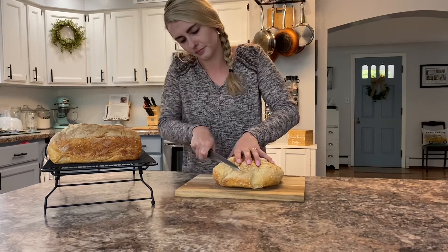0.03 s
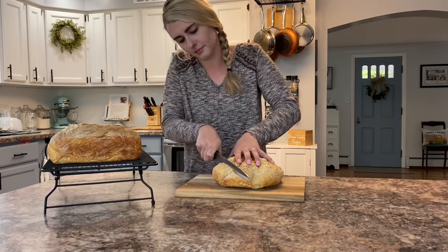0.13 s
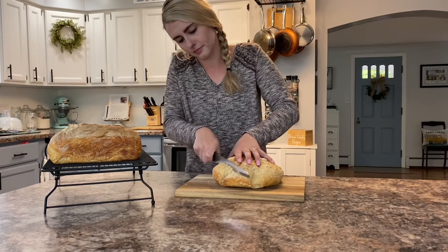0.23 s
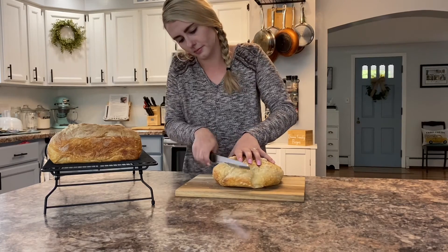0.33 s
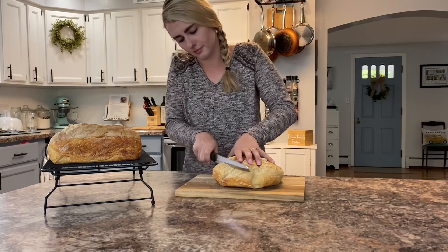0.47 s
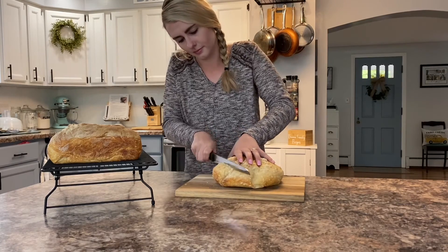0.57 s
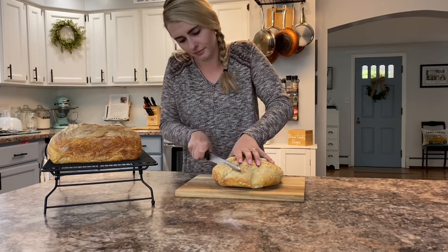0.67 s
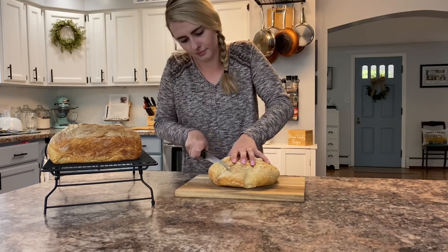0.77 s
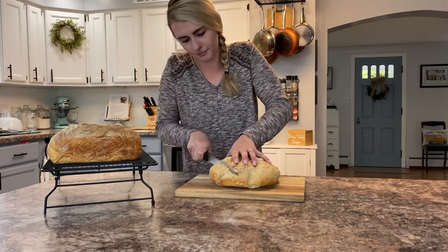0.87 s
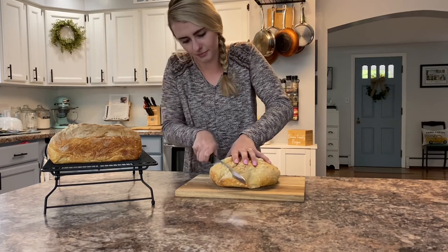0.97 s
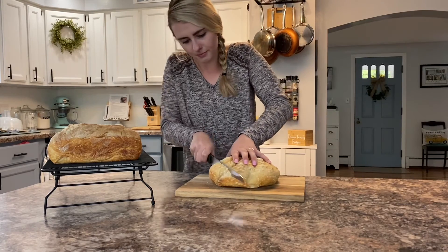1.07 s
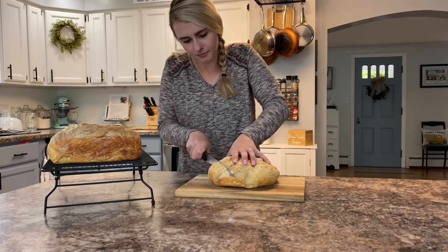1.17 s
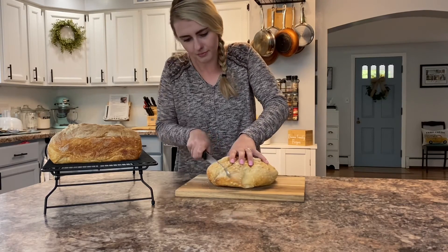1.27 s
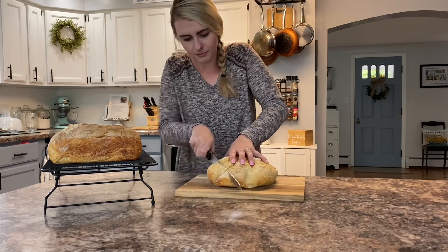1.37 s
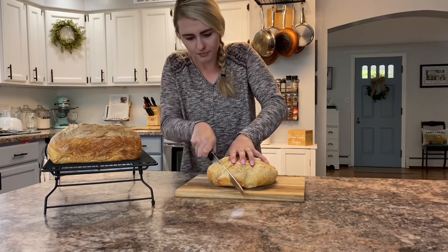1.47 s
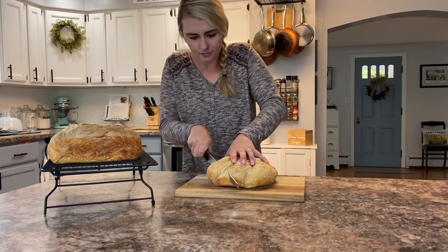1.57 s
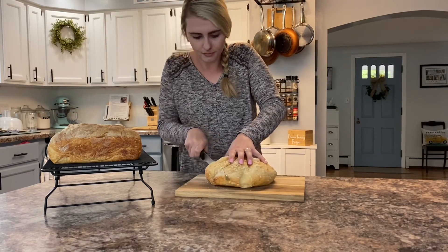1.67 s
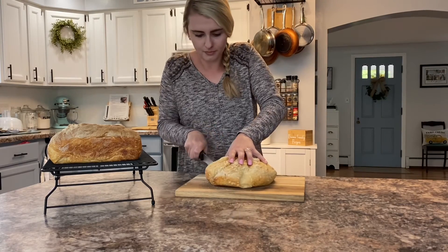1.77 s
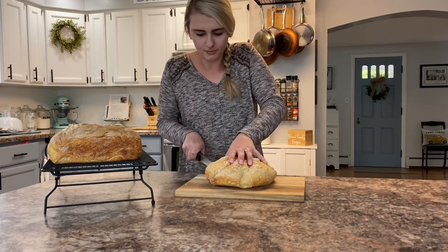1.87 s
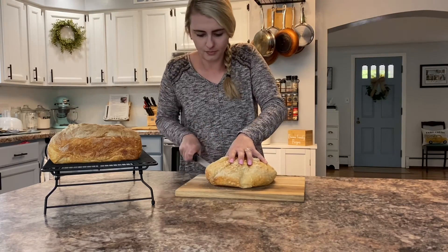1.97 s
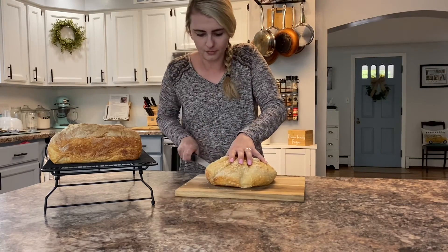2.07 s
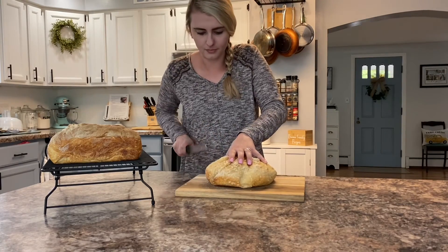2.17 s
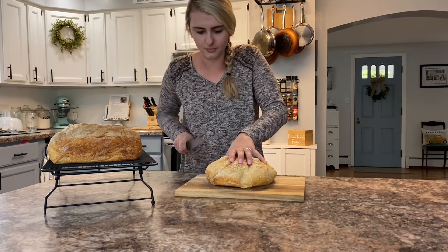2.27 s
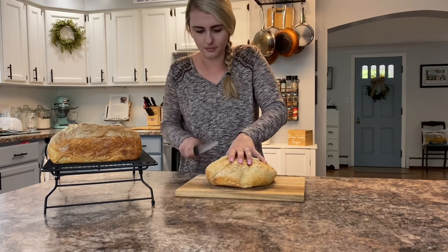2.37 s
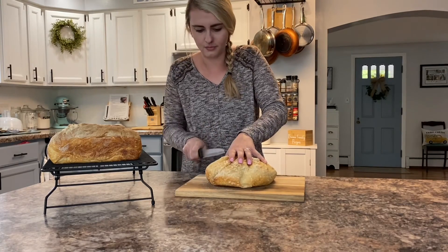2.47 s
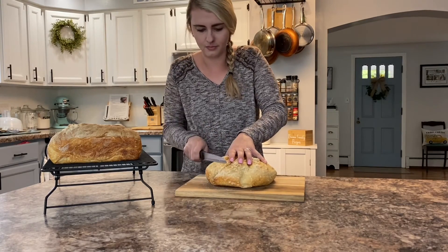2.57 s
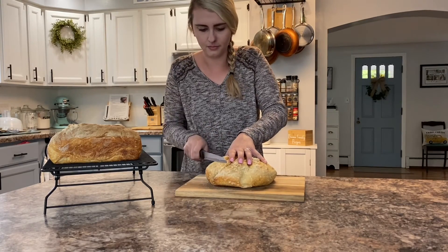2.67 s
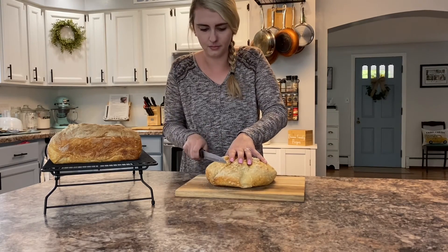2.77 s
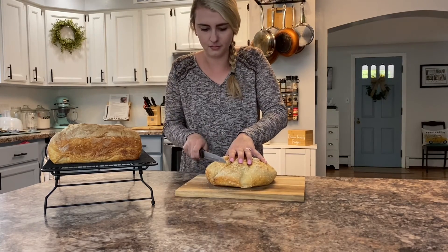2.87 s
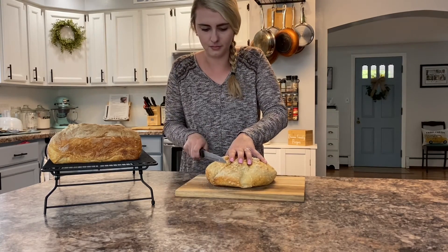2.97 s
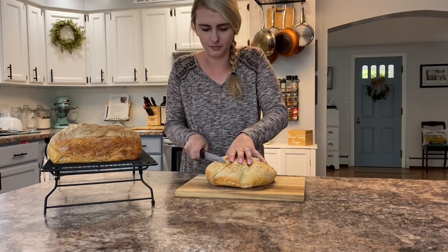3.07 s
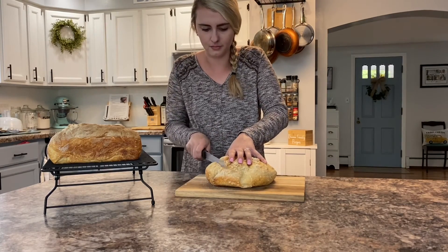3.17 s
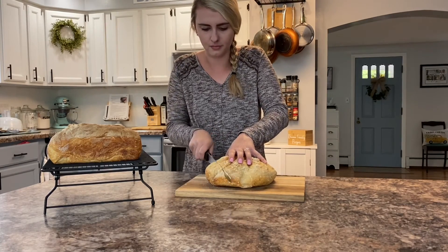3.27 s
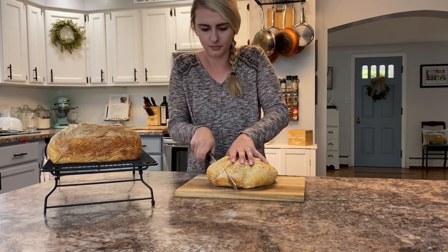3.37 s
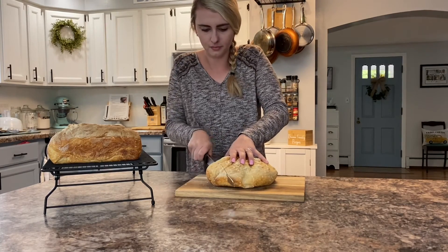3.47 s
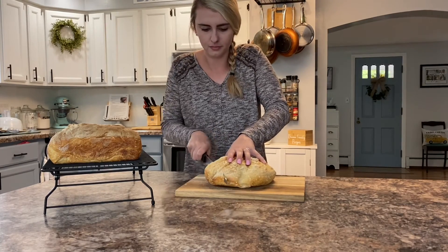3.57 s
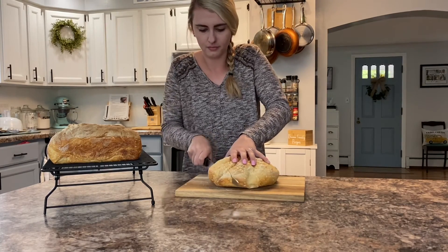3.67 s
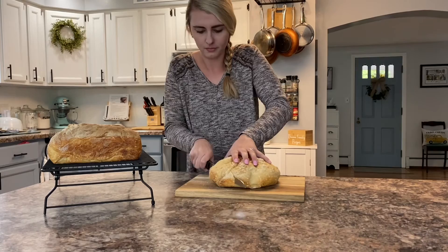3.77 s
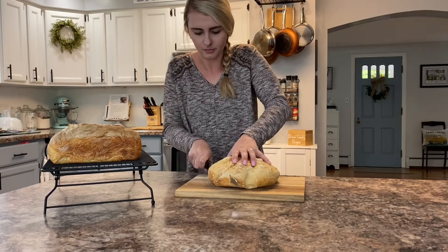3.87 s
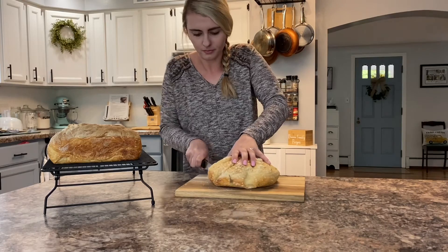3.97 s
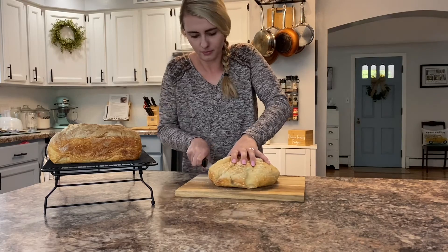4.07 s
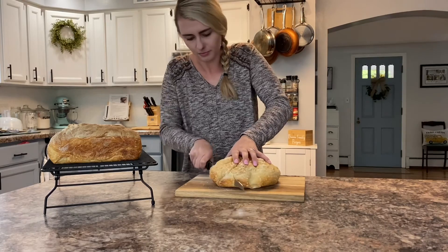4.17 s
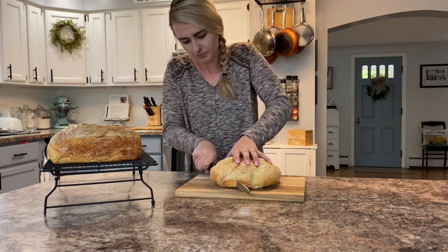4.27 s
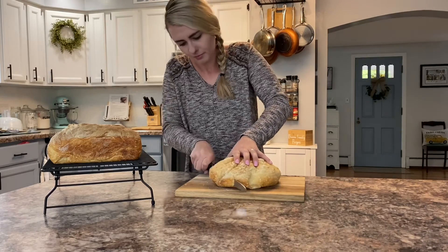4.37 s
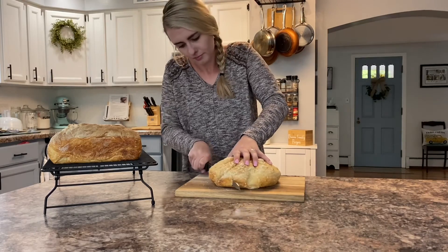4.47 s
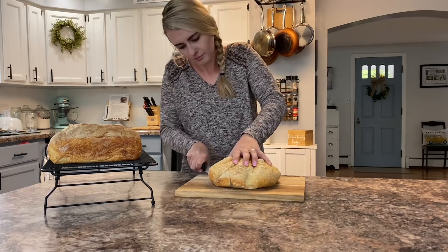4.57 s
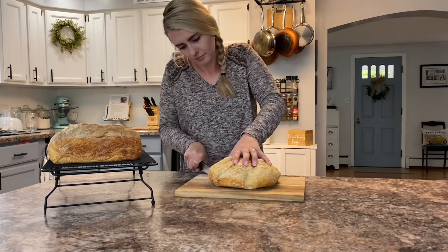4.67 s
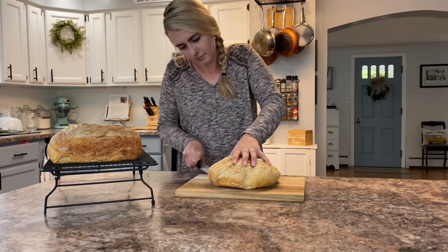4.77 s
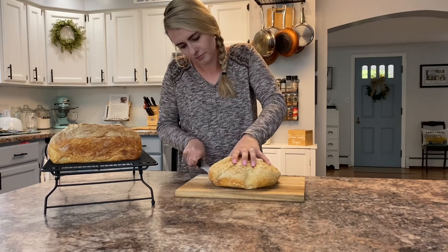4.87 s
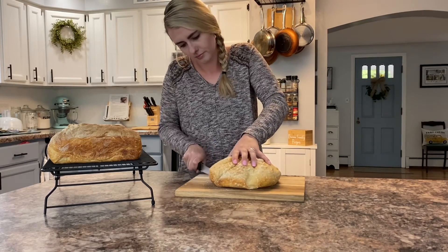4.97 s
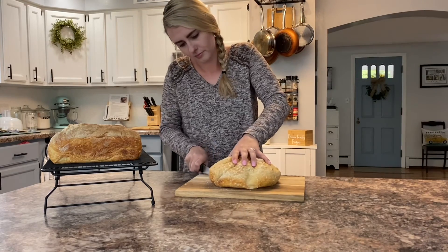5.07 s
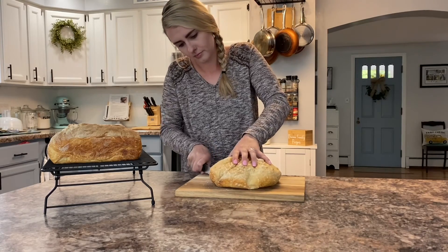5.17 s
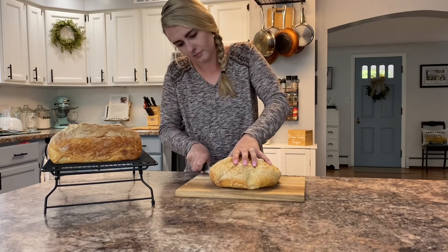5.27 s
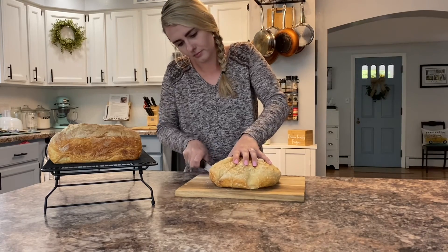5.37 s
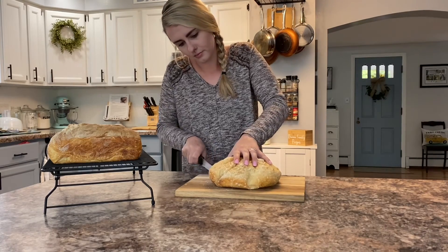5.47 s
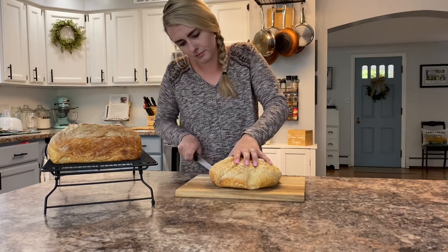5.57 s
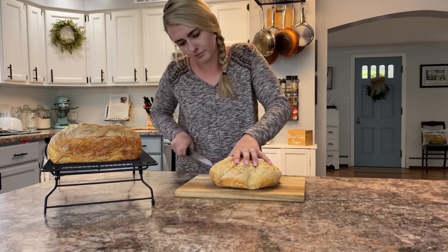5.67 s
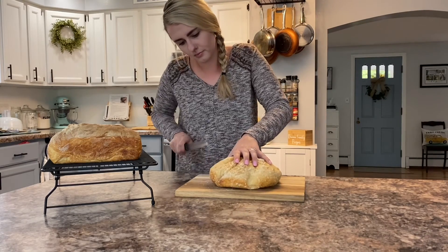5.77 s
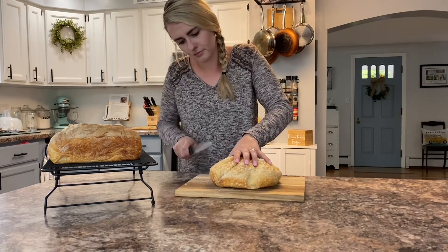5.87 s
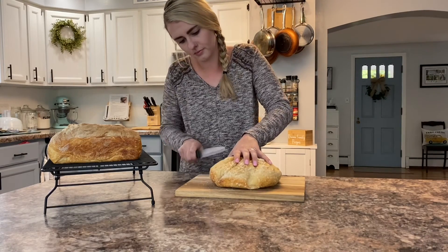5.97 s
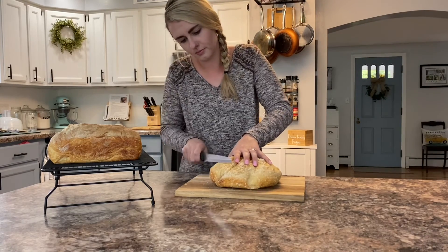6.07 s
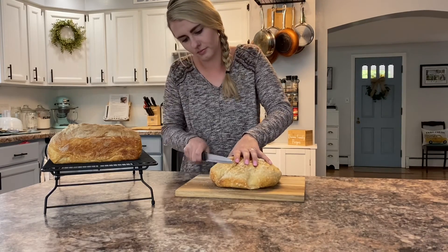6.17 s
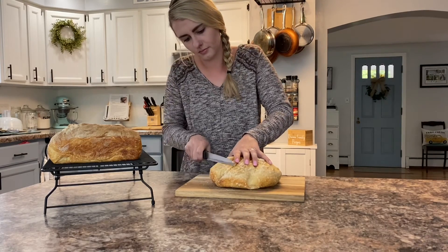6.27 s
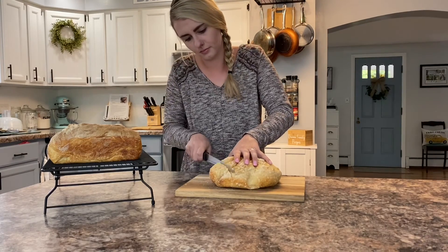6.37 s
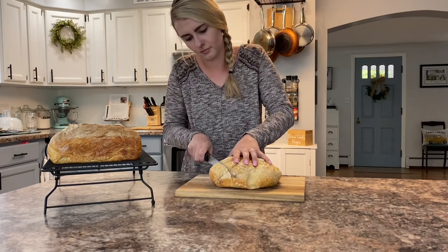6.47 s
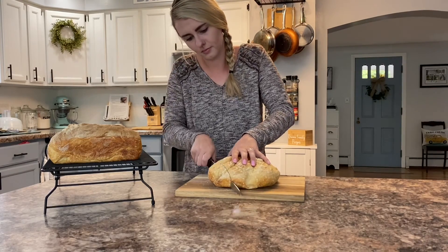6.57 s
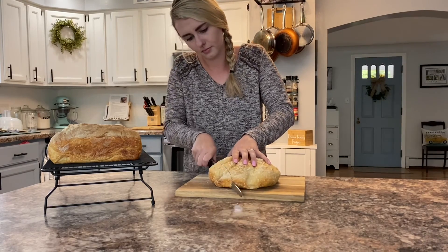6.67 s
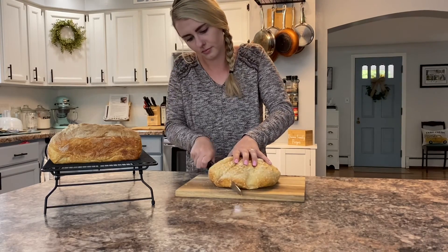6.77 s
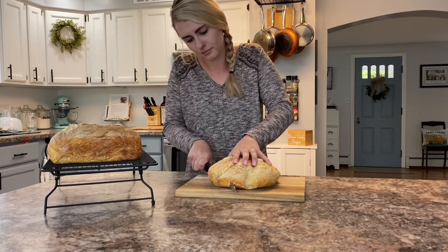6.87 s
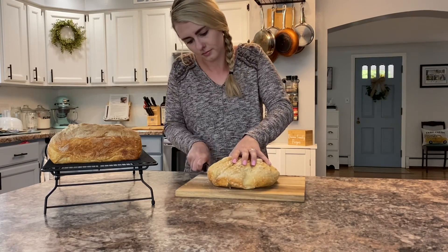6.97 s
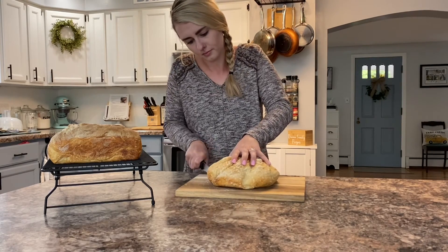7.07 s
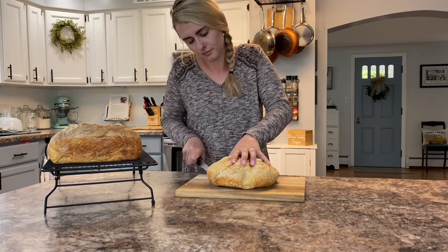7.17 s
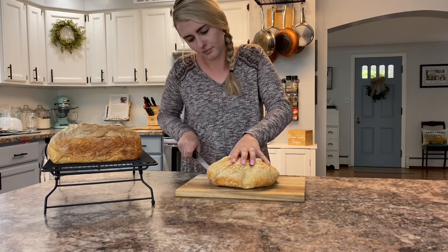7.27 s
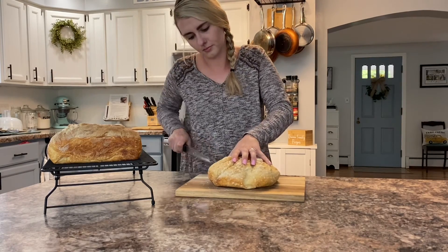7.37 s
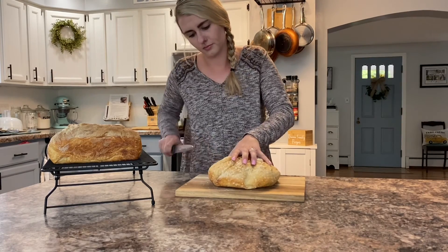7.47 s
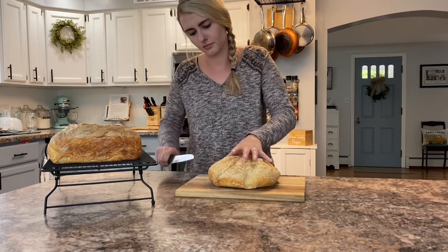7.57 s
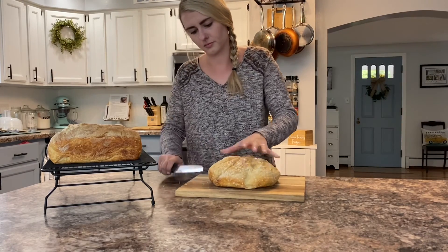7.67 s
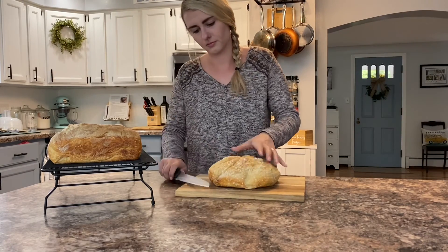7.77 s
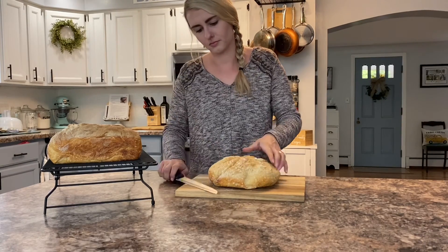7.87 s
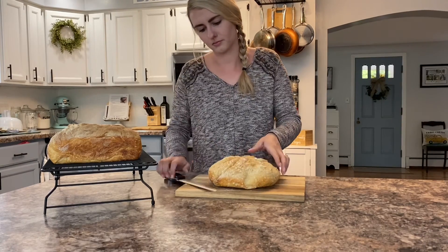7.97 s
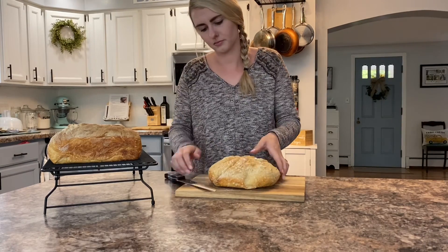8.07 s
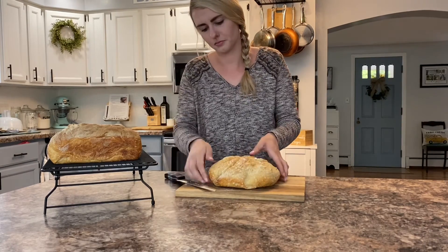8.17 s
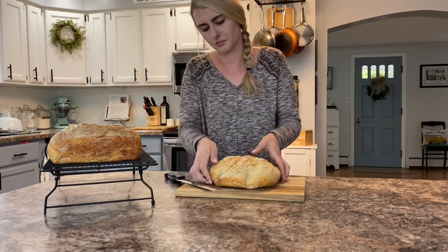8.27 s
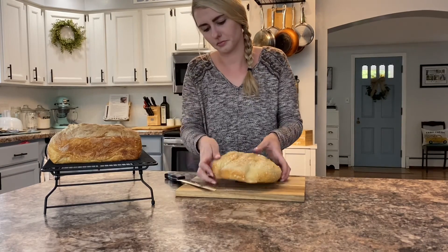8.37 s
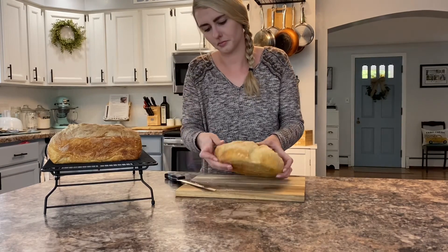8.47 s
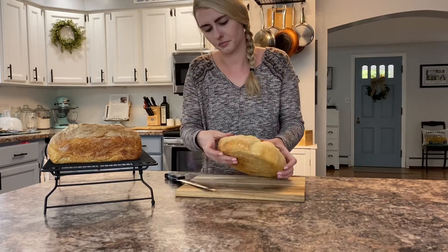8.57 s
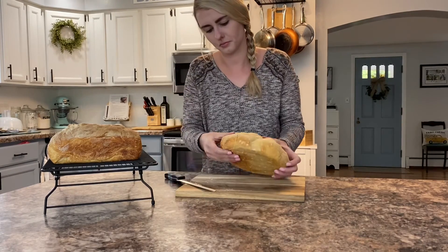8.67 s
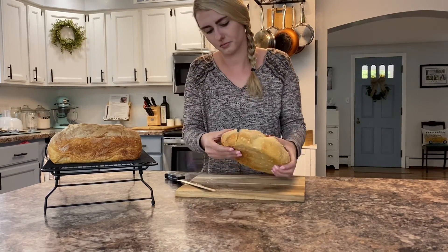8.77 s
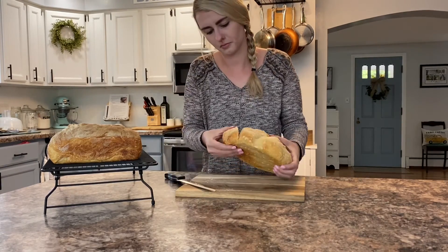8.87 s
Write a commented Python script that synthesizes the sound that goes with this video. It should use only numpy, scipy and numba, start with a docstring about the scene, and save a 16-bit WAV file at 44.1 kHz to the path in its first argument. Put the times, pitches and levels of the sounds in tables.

```python
"""A serrated knife saws a crusty loaf on a wooden board, heard in stereo in a live kitchen.
Each tooth catches, shakes the board and tugs the loaf, and fine random fractures crumble the crust;
larger flakes snap off one by one as short pressure swings with splinters.
The knife is put down with a sharp knock, from bending waves and ringing modes, and the loaf is lifted.
Fingers rub the crust in bursts of grains; a low room hum, made of coloured noise, lies behind it all."""
import sys
import numpy as np
from scipy import signal
from scipy.fft import rfft, irfft
from scipy.io import wavfile
from scipy.ndimage import uniform_filter1d
from numba import njit

SR = 44100
rng = np.random.default_rng(int(sys.argv[2]) if len(sys.argv) > 2 else 0)


def inscribe(sig):
    """Save sig as 16-bit PCM at rate SR to the path in sys.argv[1].

    A 1-D sig is mono; a 2-D sig holds one channel per row.
    Samples are clipped to [-1, 1] before scaling.
    """
    pcm = np.round(np.clip(np.atleast_2d(sig).T, -1, 1) * 32767)
    wavfile.write(sys.argv[1], SR, pcm.astype(np.int16))


N = 393813
TIME = np.arange(N) / SR
MOTION_TIME = np.arange(0, N / SR, .001)  # arm movements are drawn every millisecond

# All levels below are relative: the mix adds its own gains and the room's answer.
# pushes and pulls of the blade: start_s, length_s, fastest_share, hardest_pressed_share,
#   most_shudder_share (shares of the stroke), crust_crunch_db, serration_rasp_db, crumb_hiss_db,
#   loaf_drag_db, board_shudder_db, teeth_hz (at full speed), loaf_hollow_hz, hollow_glide_octaves
STROKES = [(-0.08, 0.17, 0.62, 0.44, 0.27, -40.5, -54.5, -47.5, -34, -36, 103.5, 290, -.4),
           (0.138, 0.22, 0.26, 0.22, 0.24, -67, -75, -61, -58.5, -55.5, 76, 299, 0),
           (0.351, 0.11, 0.45, 0.22, .2, -106, -97, -68, -60, -55, 67, 303, 0),
           (0.522, 0.2, .85, 0.41, .55, -45.5, -44, -51.5, -38.5, -35, 70, 206, -.4),
           (0.751, 0.18, 0.65, 1, 0.76, -43, -41, -49, -36, -37.5, 59.4, 330, .4),
           (1.025, 0.15, .82, 0.4, 0.57, -45, -43, -49, -35.5, -31.5, 78, 309.5, -1.2),
           (1.227, 0.17, 0.35, 0.65, 0.63, -49, -45, -56, -37.5, -41.5, 99, 382, .4),
           (1.464, 0.28, 0.33, 0.23, .66, -46.5, -47, -53, -43, -41.5, 85.6, 280, -.5),
           (1.774, 0.15, 0.16, 0.25, 0.41, -46, -51, -58, -41, -39.5, 86.4, 390, -.5),
           (1.955, 0.22, 0.27, 0.088, .1, -62, -59.5, -65.5, -54, -79, 81, 294, 0),
           (3.125, 0.18, 0.36, 0.45, 0.38, -50.5, -52, -59, -51, -49.5, 70, 300, 0),
           (3.359, 0.16, 0.68, 0.49, 0.53, -51, -44.5, -56.5, -48.5, -44.5, 81, 320, 0),
           (3.539, 0.12, 0.42, 0.6, 0.7, -48.5, -41, -54, -42.5, -48.5, 98, 380, -.5),
           (3.715, .11, 0.42, 0.35, .3, -54.5, -50.5, -63, -54.5, -65, 74, 300, 0),
           (3.814, .15, 0.28, 0.24, .55, -53, -46, -57.5, -43, -40, 70.7, 314, -.4),
           (3.996, 0.19, 0.42, 0.44, 0.5, -47.5, -44.5, -58, -43.5, -43, 77, 384, 0),
           (4.308, 0.23, 0.78, 0.85, 0.76, -48, -44.5, -56.5, -45.5, -45, 90, 480, .4),
           (4.546, 0.13, 0.6, 0.17, 0.44, -49.5, -46, -57.5, -43, -49.5, 103, 450, -.6),
           (4.778, 0.088, 0.32, 0.5, .5, -56.5, -50, -65, -56, -85, 69, 300, 0),
           (4.906, 0.25, 0.72, 0.47, 0.8, -59.5, -56.5, -66, -48.5, -55, 71, 350, .7),
           (5.338, 0.049, 0.45, 0.45, 0.52, -51, -55, -71, -55, -53, 82, 430, 0),
           (5.39, 0.18, .48, 0.44, .3, -53.5, -64, -68, -45.5, -63.5, 62, 620, 1),
           (6.014, 0.33, .12, 0.1, 0.26, -62, -71, -78, -55.5, -53.5, 62, 286, 0),
           (6.379, 0.17, 0.63, 0.42, .4, -50.5, -54, -61.5, -49.5, -52, 70, 300, 0),
           (6.686, 0.23, 0.49, 0.65, 0.69, -53, -47.5, -61.5, -54.5, -55, 76, 400, 0),
           (6.891, 0.22, 0.35, 0.29, .35, -56, -45.5, -62.5, -42, -50.5, 69, 560, -1),
           (7.007, 0.3, 0.14, .27, .55, -59, -58.5, -65, -53, -55, 67, 310, -.5)]
# the blade slides out of the cut and sings: peak_s, level_db
WITHDRAWALS = [(2.049, -67), (5.5, -51.5), (7.28, -62.5)]
# large flakes of crust snapping: start_s, level_db, centre_hz, crumbling_s
SNAPS = [(0.0165, -27, 2100, .003), (0.0307, -20, 2300, .0015), (0.0332, -19, 2000, .0015),
         (0.0555, -29, 2100, .003), (0.5255, -37, 1740, .001), (0.5544, -30, 2300, .002),
         (0.56, -29, 1900, .0015), (0.5765, -31, 1900, .003), (0.6063, -23.5, 1500, .0012),
         (0.626, -33, 1700, .002), (0.6535, -31, 1000, .002), (0.8218, -22, 2600, .001),
         (0.8437, -23.5, 2400, .0015), (0.8607, -30, 1900, .002), (0.8772, -26, 1400, .003),
         (0.9030, -23, 2100, .004), (0.9078, -23, 2100, .002), (0.9255, -30, 1500, .001),
         (1.081, -33, 970, .002), (1.1855, -29, 3800, .001), (1.2698, -24, 2000, .001),
         (1.2915, -26, 2000, .0015), (1.3035, -27, 2000, .002), (1.3149, -19.5, 2100, .0012),
         (1.3277, -24, 1600, .002), (1.3400, -28, 1600, .003), (1.3596, -27, 2200, .0015),
         (1.4955, -33, 1800, .002), (1.5155, -31, 1000, .004), (1.5886, -30, 3500, .001),
         (1.6015, -33, 3000, .001), (1.7777, -22, 2600, .0012), (1.793, -33, 2200, .002),
         (1.8073, -29, 2100, .0015), (3.185, -36, 2600, .004), (3.369, -42, 8000, .001),
         (3.415, -37, 1900, .002), (3.6147, -20.5, 3000, .0012), (3.8519, -26, 2500, .001),
         (3.886, -31, 1400, .002), (4.041, -33, 2400, .001), (4.059, -31, 1000, .002),
         (4.0747, -31, 2900, .001), (4.1338, -25, 2000, .0015), (4.4477, -21.5, 2500, .0015),
         (4.4696, -23, 2900, .0012), (4.565, -34, 1600, .002), (4.649, -34, 2500, .001),
         (4.8612, -37, 6000, .001), (6.0541, -49, 9000, .001), (6.125, -50, 1900, .003),
         (6.306, -49, 1900, .003), (6.342, -51, 1700, .001), (6.407, -40, 1700, .002),
         (6.4665, -36, 2400, .002), (6.5025, -34, 1500, .003), (6.8506, -31, 3700, .001),
         (6.9083, -28.5, 2900, .0012), (6.918, -35, 3600, .001), (8.227, -47, 2600, .001),
         (8.461, -47, 2400, .002), (8.475, -46, 1800, .003), (8.8625, -35, 8500, .001),
         (8.8651, -40, 1700, .002)]
# knife and loaf knocking on the board: start_s, level_db, contact_brightness_hz, counter_boom_db,
#   mode_struck_hardest_hz, ring_against_blow_db (low where the loaf damps the board)
KNOCKS = [(2.506, -41.5, 2620, -72, 994, -31.5), (2.953, -45, 1990, -67, 1085, -35),
          (3.018, -40.5, 582.5, -55, 543, -32), (6.0215, -46.5, 3047, -62, 960, -39),
          (6.5437, -37, 328.7, -50.5, 280, -36), (6.553, -42.5, 298, -57.5, 277, -34),
          (7.735, -51, 2600, -75, 1450, -23), (7.759, -42, 610, -64, 282, -18),
          (7.774, -43.5, 295, -62, 280, -31), (7.8296, -27, 1510, -44, 984, -21.5),
          (7.854, -29, 1210, -54, 416, -23), (7.8694, -9.5, 1900, -41, 1000, -27.5),
          (7.8723, -16.5, 730, -52, 630, -26.5), (7.880, -22.5, 1100, -54, 544, -30),
          (7.891, -16.5, 1380, -35, 1100, -35), (7.903, -18, 710, -49.5, 440, -32.5),
          (7.924, -18, 910, -36.5, 275, -25.5), (7.9498, -15, 1170, -49, 1105, -30.5),
          (8.211, -41, 300, -50.5, 280, -45), (8.347, -59, 1500, -75, 967, -18),
          (8.5649, -30.5, 2700, -42.5, 967, -26), (8.567, -36.5, 696, -58, 417, -23)]
# the steel blade slapping down: start_s, level_db, chatter_s, brightness_hz
CLINKS = [(7.736, -48, 0.0022, 8800), (7.828, -37.5, 0.0096, 6000), (7.852, -43, 0.0014, 6000),
          (7.8686, -19.5, 0.0012, 15000), (7.9168, -20.5, 0.0026, 4870), (7.9513, -51, 0.0011, 14000)]
# fingers on the crust: start_s, length_s, fastest_share (of the length), rub_db, fine_hiss_db
HANDS = [(2.1, 0.61, 0.19, -71, -95), (5.241, 0.095, 0.64, -70, -79.5), (6.27, 0.067, 0.53, -69, -84),
         (7.425, 0.052, 0.53, -85, -89), (7.753, 0.072, 0.47, -53.5, -78.5),
         (8.297, 0.13, 0.84, -56, -78.5), (8.443, 0.087, 0.19, -55.5, -71.5),
         (8.624, 0.091, 0.74, -56.5, -70.5), (8.823, 0.087, 0.64, -56, -74)]

# modes of the board: pitch_hz, level_db, t60_s
BOARD_MODES = [(269, -1, 0.4), (288, -3, 0.46), (417, 0, 0.37), (535, -2, 0.5), (568, -3, 0.6),
               (629, 3, 0.36), (778, 0, 0.45), (857, 1, 0.55), (889, -4, 0.7), (967, 2, 0.28),
               (1064, 0, 0.26), (1114, 2, 0.27), (1437, -7, 0.55), (1487, -6, 0.25)]
# modes of the blade: pitch_hz, level_db, t60_s
BLADE_MODES = [(2482, 1, .25), (2525, -1, .35), (3074, -6, .4), (3640, 4, .33), (3994, -6, .15),
               (4118, -4, .12), (4554, -7, .3), (4893, -7, .27)]
# boom of the counter under the board: pitch_hz, level_db, t60_s
COUNTER_MODES = [(89.3, 2.5, 0.47), (141.53, -3.5, 0.33), (195.75, -3.5, 0.32)]

# spectrum of a blow on the board: frequency_hz, density_db_per_hz
KNOCK_COLOUR = [(40, -32), (85, -7), (160, -4), (280, -3), (460, -4.5), (610, 0.5), (740, -0.5), (980, 0.5),
                (1300, -5), (1630, -14.5), (1950, -5), (2500, -13), (3000, -16), (3500, -22), (5000, -19),
                (15000, -36)]
# spectrum of the blade's chatter on wood: frequency_hz, density_db_per_hz
CLINK_COLOUR = [(500, 7), (1500, 18), (2050, 8.5), (2500, 11), (3200, -3.5), (3700, 7), (4400, 1),
                (5500, -8.5), (7000, 0.5), (11000, -2.5), (16000, -4)]
# spectrum of the crust giving way: frequency_hz, density_db_per_hz
CRUNCH_COLOUR = [(300, -17.5), (550, 4.5), (750, 4), (1000, 5.5), (1400, 0), (1850, -2), (2400, -13),
                 (3000, -38.5), (5000, -50)]
# spectrum of the scraping serrations: frequency_hz, density_db_per_hz
RASP_COLOUR = [(1200, -2), (2200, 2.5), (2900, 0.5), (4000, -2), (5000, -7), (6000, -10), (7000, -13.5),
               (9000, -26.5), (16000, -28.5)]
# spectrum of the fine crumbs: frequency_hz, density_db_per_hz
HISS_COLOUR = [(3000, -41.5), (6000, -10.5), (7000, 5), (8500, 2), (11000, 6.5), (13000, 4), (16000, -3.5)]
# spectrum of the tugged loaf: frequency_hz, density_db_per_hz
DRAG_COLOUR = [(90, -24.5), (140, 8.5), (220, -3), (310, 1), (400, 2.5), (540, -6.5), (750, -9.5),
               (1100, -8.5), (2000, -55.5)]
# spectrum of the shaken board: frequency_hz, density_db_per_hz
SHUDDER_COLOUR = [(20, -24), (40, -6.5), (62, 6.5), (90, 5), (130, 1.5), (200, -7), (500, -74.5)]
# spectrum of the singing blade: frequency_hz, density_db_per_hz
SING_COLOUR = [(2400, -11), (2850, -8), (3300, -12), (3600, -5), (3880, -11), (4250, -6), (4480, -9),
               (4750, -1), (5100, -14), (7000, -19)]
# spectrum of the room hum: frequency_hz, density_db_per_hz
HUM_COLOUR = [(25, -35), (45, -6), (64, 3), (88, -6.5), (135, -6.5), (165, -19), (230, -14), (330, -23.5),
              (500, -28.5), (1000, -38), (2000, -43.5), (4000, -56), (8000, -57.5), (16000, -58)]

# kitchen reverberation: frequency_hz, t60_s
ROOM_T60 = [(100, .5), (400, .62), (1000, .62), (2500, .68), (5000, .58), (10000, .44), (16000, .35)]
# echoes from the counter top and the cupboards: delay_s, level_db (against the whole reverberation)
ECHOES = [(.0013, -40), (.0029, -25), (.0049, -14), (.0094, -21), (.0158, -20), (.0295, -40.5)]
# likeness of the reverberation at the two ports: frequency_hz, correlation (-1 to 1)
PORT_LIKENESS = [(100, 0.97), (300, 0.6), (600, -0.27), (1100, -0.081), (2200, -0.21), (5000, 0.22)]
# lean of the stereo microphone: frequency_hz, left_over_right_db
MIC_LEAN = [(60, -0.5), (150, -2.0), (500, 0.5), (1000, 1.5), (2000, -0.5), (4500, 2.0), (7000, 0.2)]
# phase lead of the left port: frequency_hz, lead_radians
MIC_LEAD = [(1400, .05), (2500, .5), (5000, .3), (6900, 0)]

HUM_LEVEL_DB = -55.5
TOP_HZ = 15850  # the microphone takes in nothing much above this
SWING_SHAPE = 2.3  # 2 is a bell; more gives a flatter top and quicker turns
# each sound grows as a power of the blade's speed, its pressure or the board's shaking
CRUNCH_POWER, RASP_POWER, HISS_POWER, DRAG_POWER, SHUDDER_POWER = 1.01, 1.14, 1.3, 1.39, 1.78
RUB_POWER = 1  # the same for the fingers
SHUDDER_LAG_S = 0.0095  # the loaf is tugged first, then the board follows
TEETH_SLOWING = .14  # share by which the tooth rate drops at a turn of the blade
LOAF_SWEEP_OCTAVES, LOAF_WIDTH_HZ = 0.35, 70.0
LOAF_HOLLOW_DB, LOAF_LEVEL_DB = -2.5, -8
# the harder the board shudders, the more cleanly the teeth catch;
# in light strokes the blade only rubs through the crumb
RUB_BELOW_DB, CATCH_ABOVE_DB = -52, -33
SING_RISE_DB_PER_S, SING_FALL_DB_PER_S = 112, 151
SING_IN_CUT_DB = -16  # the blade's song within the cut, against the rasp
SNAP_DB, SNAP_CRUMBLE, SNAP_SPRAY = 2, .6, .5
# small random flakes: level against the crunch, scatter, centre, spread of the centre
FLAKE_DB, FLAKE_SCATTER_DB, FLAKE_HZ, FLAKE_OCTAVES = -2, 10, 2345.7, 0.29
# how much a blow favours its nearest modes, and how far the favour spreads
STRUCK_DB, STRUCK_OCTAVES = 14, .06


def undb(db):
    """Decibels to gain."""
    return 10 ** (np.asarray(db) / 20)


def unit(x):
    """Scale to rms 1."""
    return x / np.sqrt(np.mean(x ** 2))


def along(points, hz):
    """Read a table of (Hz, value) on a log-frequency axis."""
    f, value = np.transpose(points)
    return np.interp(np.log(hz + 1), np.log(f), value)


def convolve(x, response):
    """Pass a sound through a response, keeping its length."""
    return signal.oaconvolve(x, response)[:len(x)]


def impulse(colour, size=4096):
    """The causal impulse response of a spectrum, through its cepstrum."""
    gain = undb(along(colour, np.fft.rfftfreq(size, 1 / SR)))
    cepstrum = irfft(np.log(gain))
    cepstrum[1:size // 2] *= 2
    cepstrum[size // 2 + 1:] = 0
    return irfft(np.exp(rfft(cepstrum)))


def shaped(x, colour):
    """Give a sound a spectrum, at rms 1."""
    return unit(convolve(x, impulse(colour)))


def butter(x, hz, kind, order=2):
    """A plain low-pass or high-pass."""
    sections = signal.butter(order, min(hz, SR / 2 - 1000), kind, fs=SR, output="sos")
    return signal.sosfilt(sections, x)


@njit
def resonate(x, hz, width):
    """A band-pass whose centre moves, as a two-integrator filter."""
    y, band, low = np.empty(len(x)), 0., 0.
    for i in range(len(x)):
        g, k = np.tan(np.pi * hz[i] / SR), width / hz[i]
        v = (band + g * (x[i] - low)) / (1 + g * (g + k))
        band, low, y[i] = 2 * v - band, low + 2 * g * v, k * v
    return y


def add(track, s, sound):
    """Mix a sound in at a time."""
    i = max(int(s * SR), 0)
    track[i:i + len(sound)] += sound[:N - i]


def decay(t, t60):
    """An exponential fall of 60 dB in t60 seconds."""
    return np.exp(-np.log(1000) * t / t60)


def ring(modes):
    """Decaying sines of a struck object, each from a random phase."""
    t = TIME[:SR]
    total = np.zeros(SR)
    for hz, db, t60 in modes:
        phase = rng.uniform(0, 2 * np.pi)
        total += undb(db) * decay(t, t60) * np.sin(2 * np.pi * hz * t + phase)
    return total


def grains(per_s, spread_db, size=N):
    """Dense tiny fractures of random sign, their strengths scattered in decibels."""
    strength = undb(spread_db * np.minimum(rng.standard_exponential(size), 5))
    return (rng.random(size) < per_s / SR) * strength * rng.choice([-1, 1], size)


def walk(rate):
    """Random levels held 1 / rate s and slewed; spread near 1."""
    k = int(SR / rate)
    held = np.repeat(rng.standard_normal(N // k + 1), k)
    return unit(uniform_filter1d(held, k)[:N])


def swing(start, length, peak):
    """One movement of the arm: a lopsided bell that reaches 1 at a share of its length."""
    peak = np.clip(peak, .08, .92)
    past = (MOTION_TIME - start) / length - peak
    away = np.maximum(-past / peak, past / (1 - peak))
    return np.exp(-np.minimum(away, 4) ** SWING_SHAPE)


def swells(movements, dbs, power, lag_s=0):
    """The level of a sound that grows with each movement."""
    level = sum(undb(db) * movement ** power for movement, db in zip(movements, dbs))
    return np.interp(TIME - lag_s, MOTION_TIME, level)


def kitchen():
    """A few near echoes and a diffuse tail at two ports; the bass is alike on both."""
    t, hz = TIME[:SR], np.fft.rfftfreq(SR, 1 / SR)
    centres = np.transpose(ROOM_T60)[0]
    likeness = along(PORT_LIKENESS, hz).clip(-1, 1)
    mid, side = np.exp(2j * np.pi * rng.random((2, len(hz))))
    ports = mid * np.sqrt(1 + likeness) + np.array([[1], [-1]]) * side * np.sqrt(1 - likeness)
    tail = 0
    for share, (_, t60) in zip(np.eye(len(centres)), ROOM_T60):
        band = irfft(ports * along(np.c_[centres, share], hz))
        tail = tail + band * decay(t, t60)
    # the nearest surfaces answer first and strongest
    tail *= np.clip((t - .002) / 0.0022, 0, 1) * (1 + .5 * np.exp(-t / 0.012))
    tail /= np.sqrt(np.sum(tail ** 2) / 2)
    for k, (s, db) in enumerate(ECHOES):
        # small surfaces return little bass
        echo = undb(db) * butter(np.pad([.5, 1, .5], (0, 256)), 650, "high")
        # from alternate sides, a little later at the far port
        add(tail[k % 2], s, echo)
        add(tail[1 - k % 2], s + 0.00046, echo)
    return tail


def heard(x, room, wet_db):
    """Direct sound plus the kitchen's answer."""
    return x + undb(wet_db) * np.array([convolve(x, port) for port in room])


def hum():
    """Low household rumble with a faint hiss; only the upper part differs between the ports."""
    mid, side = (shaped(rng.standard_normal(N), HUM_COLOUR) for _ in range(2))
    spread = 0.67 * np.array([[1], [-1]]) * butter(side, 320, "high", order=1)
    return undb(HUM_LEVEL_DB) * (mid + spread)


def hands(room):
    """Fingers shift their grip and rub the dry crust: grains that swell with their speed."""
    speed = [swing(s, length, fastest) for s, length, fastest, *_ in HANDS]
    *_, rub_db, hiss_db = np.transpose(HANDS)
    colours = CRUNCH_COLOUR, RASP_COLOUR, HISS_COLOUR, DRAG_COLOUR
    crunch, rasp, hiss, drag = (shaped(grains(per_s=4200, spread_db=4.0), colour) for colour in colours)
    rub = undb(-9.5) * crunch + undb(-10.0) * rasp + undb(-6.0) * drag
    rub = rub * swells(speed, rub_db, RUB_POWER)
    crumbs = undb(7.0) * hiss * swells(speed, hiss_db, RUB_POWER)
    return heard(rub + crumbs, room, wet_db=-4.5)


def clinks(room):
    """The blade chatters for a moment on the wood and rings faintly."""
    track, t, steel = np.zeros(N), TIME[:SR], ring(BLADE_MODES)
    for s, db, chatter_s, bright_hz in CLINKS:
        burst = rng.standard_normal(SR) * np.exp(-t / chatter_s)
        chatter = butter(convolve(burst, impulse(CLINK_COLOUR)), bright_hz, "low")
        add(track, s, undb(db) * (chatter / np.abs(chatter).max() + undb(-38) * steel))
    return heard(track, room, wet_db=2.5)


def struck(near_hz):
    """The board's ring, strongest in the modes that move most where the blow lands."""
    modes = []
    for hz, db, t60 in BOARD_MODES:
        nearness = np.exp(-(np.log2(hz / near_hz) / STRUCK_OCTAVES) ** 2)
        modes.append((hz, db + STRUCK_DB * nearness, t60))
    return ring(modes)


def knocks(room, bend_s=0.001233, size=8192):
    """Blows send bending waves through the board, highs ahead of lows; board rings, counter booms."""
    hz = np.fft.rfftfreq(size, 1 / SR)
    # bend_s is the delay at 1 kHz; it shrinks with the square root of frequency
    lateness = np.exp(-4j * np.pi * bend_s * np.sqrt(hz * 1000))
    thud = irfft(rfft(impulse(KNOCK_COLOUR), size) * lateness)
    thud /= np.abs(thud).max()
    blows, ringing, boom = np.zeros(N), np.zeros((2, N)), np.zeros(N)
    build_up = 1 - np.exp(-TIME[:SR] / 0.00067)
    for s, db, contact_hz, boom_db, near_hz, board_db in KNOCKS:
        blow = butter(thud, contact_hz, "low")
        gain = undb(db) / np.abs(blow).max()
        add(blows, s - .0005, gain * blow)
        for port in ringing:  # each port hears the modes in phases of its own
            board = build_up * butter(struck(near_hz), contact_hz, "low")
            add(port, s, gain * undb(board_db) * board)
        add(boom, s, undb(boom_db) * build_up * ring(COUNTER_MODES))
    return heard(blows, room, wet_db=-4) + ringing + boom


def flakes(count=4):
    """Small flakes break at random around the hardest press, scaled to the crunch; rows as in SNAPS."""
    rows = []
    for s, length, _, hardest, _, crunch_db, *_ in STROKES:
        for when, size, pitch in rng.standard_normal((count, 3)):
            at = s + length * np.clip(hardest + 0.29 * when, 0, 1)
            level_db = crunch_db + FLAKE_DB + FLAKE_SCATTER_DB * size
            rows.append((at, level_db, FLAKE_HZ * 2 ** (FLAKE_OCTAVES * pitch), .001))
    return rows


def snaps(room):
    """A flake breaks with a swing of pressure; splinters follow, ringing the crust at its pitch."""
    track, t = np.zeros(N), TIME[:1024]
    for s, db, hz, crumble_s in list(SNAPS) + flakes():
        cycles = t * hz
        pulse = np.sin(2 * np.pi * cycles) * cycles / .42 * np.exp(1 - cycles / .42)
        splinters = grains(per_s=15000, spread_db=4.0, size=len(t)) * np.exp(-t / crumble_s)
        crumble = resonate(splinters, np.full(len(t), float(hz)), .45 * hz)
        snap = pulse + SNAP_CRUMBLE * crumble / np.abs(crumble).max()
        snap = snap + SNAP_SPRAY * splinters / np.abs(splinters).max()
        add(track, s - .0002, undb(db + SNAP_DB) * snap / np.abs(snap).max())
    return heard(butter(track, 600, "high", order=1), room, wet_db=-6)


def teeth(rate_hz, jitter, scatter_db, count=1400):
    """One slightly uneven catch for each serration that passes through the crust."""
    chance = rng.standard_normal((count, 2))
    teeth_passed = np.cumsum(rate_hz) / SR
    at = np.searchsorted(teeth_passed, np.cumsum(np.exp(jitter * chance[:, 0])))
    catches = np.zeros(N + 1)  # catches after the end fall in the spare last place
    catches[at] = undb(scatter_db * chance[:, 1])
    return catches[:N]


def singing():
    """The level of the blade's song: it swells as the steel comes free, then dies away."""
    level = np.zeros(N)
    for s, db in WITHDRAWALS:
        drop_db = np.maximum((s - TIME) * SING_RISE_DB_PER_S, (TIME - s) * SING_FALL_DB_PER_S)
        level += undb(db - drop_db)
    return level


def sawing(room):
    """Tooth catches shake the board, tug the loaf and release bursts of crumbling crust."""
    speed = [swing(s, length, fastest) for s, length, fastest, *_ in STROKES]
    pressure = [swing(s, length, hardest) for s, length, _, hardest, *_ in STROKES]
    shaking = [swing(s, length, most) for s, length, _, _, most, *_ in STROKES]
    columns = np.transpose(STROKES)
    start_s, length_s = columns[:2]
    crunch_db, rasp_db, hiss_db, drag_db, shudder_db, teeth_hz, loaf_hz, glide = columns[5:]
    stroke = np.argmax(speed, axis=0)  # the stroke under way at each moment

    slowing = 1 - TEETH_SLOWING * (1 - np.max(speed, axis=0))
    rate_hz = np.interp(TIME, MOTION_TIME, teeth_hz[stroke] * slowing)
    catches = teeth(rate_hz, jitter=.05, scatter_db=2.5)
    # the hollow loaf glides over the stroke and rises with the pressure
    progress = np.clip((MOTION_TIME - start_s[stroke]) / length_s[stroke], 0, 1)
    octaves = glide[stroke] * (progress - .5) + LOAF_SWEEP_OCTAVES * (np.max(pressure, axis=0) - 1)
    hollow_hz = np.interp(TIME, MOTION_TIME, loaf_hz[stroke] * 2 ** octaves)

    # the crust gives way most just after each catch, and is harder in some patches than in others
    after_catch = 3 + unit(convolve(catches, np.exp(-TIME[:2048] / 0.0027)))
    bite = after_catch * undb(1.5 * walk(90))
    scraping = swells(speed, rasp_db, RASP_POWER)
    crumbling = bite * undb(2 * walk(140)) * grains(per_s=1000, spread_db=2.5)
    crunch = shaped(crumbling, CRUNCH_COLOUR) * swells(pressure, crunch_db, CRUNCH_POWER)
    rasp = shaped(bite * grains(per_s=7000, spread_db=2.0), RASP_COLOUR) * scraping * undb(-1.5)
    hiss = shaped(bite * grains(per_s=9100, spread_db=-1.5), HISS_COLOUR)
    hiss = hiss * swells(speed, hiss_db, HISS_POWER)
    song_level = undb(SING_IN_CUT_DB) * scraping + singing()
    song = shaped(rng.standard_normal(N), SING_COLOUR) * song_level

    # clean catches and rough rubbing share the tug on the loaf
    stroke_grip = np.interp(shudder_db, [RUB_BELOW_DB, CATCH_ABOVE_DB], [.1, .85])
    grip = np.interp(TIME, MOTION_TIME, stroke_grip[stroke])
    rubbing = unit(bite * grains(per_s=2500, spread_db=2))
    tug = np.sqrt(grip) * unit(catches - catches.mean()) + np.sqrt(1 - grip) * rubbing
    hollow = undb(LOAF_HOLLOW_DB) * unit(resonate(tug, hollow_hz, LOAF_WIDTH_HZ))
    drag = (undb(-1) * shaped(tug, DRAG_COLOUR) + hollow) * swells(pressure, drag_db, DRAG_POWER)
    shudder = shaped(tug, SHUDDER_COLOUR) * swells(shaking, shudder_db, SHUDDER_POWER, SHUDDER_LAG_S)

    crust = heard(crunch + rasp + hiss + song, room, wet_db=-4.0) * undb(-5.5)
    loaf = heard(drag * undb(LOAF_LEVEL_DB), room, wet_db=-7)
    return crust + loaf + heard(shudder, room, wet_db=0)


def scene():
    """Everything on the counter, in one room, over the hum."""
    room = kitchen()
    return hum() + hands(room) + clinks(room) + knocks(room) + snaps(room) + sawing(room)


def record(dry):
    """The stereo microphone leans left in the mids; its top treble is one signal, later on the left."""
    hz = np.fft.rfftfreq(2 * N, 1 / SR)
    left, right = rfft(dry, 2 * N)
    lean_db = along(MIC_LEAN, hz)
    lead = along(MIC_LEAD, hz)
    # the right port passes over to the left signal from 5.8 to 6.9 kHz
    shared = np.clip((hz - 5800) / 1100, 0, 1) * np.pi / 2
    right = (right * np.cos(shared) + left * np.sin(shared)) / np.sqrt(1 + np.sin(2 * shared) / 2)
    # above that the left port arrives 0.236 ms late
    late = 2 * np.pi * np.maximum(hz - 6900, 0) * .000236
    left = left * np.exp(1j * (lead - late))
    ports = irfft(np.array([left * undb(lean_db / 2), right * undb(-lean_db / 2)]))[:, :N]
    return signal.sosfilt(signal.ellip(10, .2, 80, TOP_HZ, fs=SR, output="sos"), ports)


dry = scene()
out = record(dry)
inscribe(out)
```